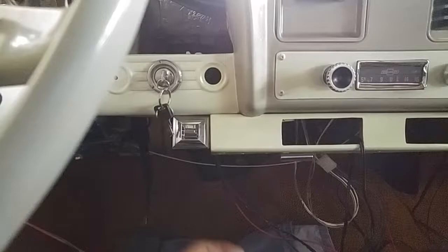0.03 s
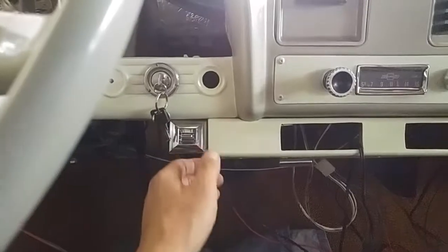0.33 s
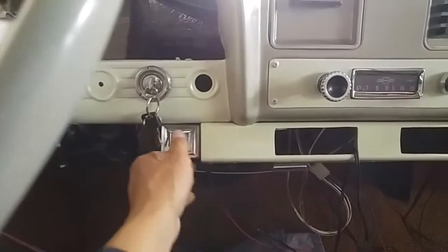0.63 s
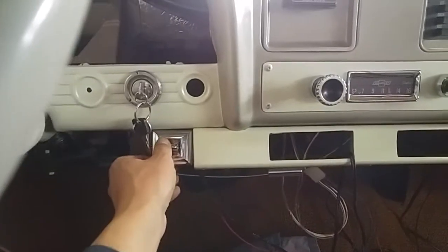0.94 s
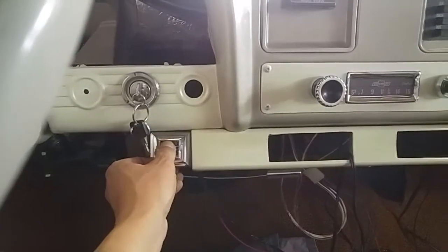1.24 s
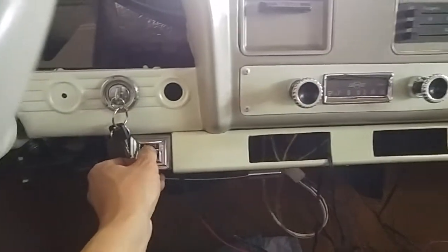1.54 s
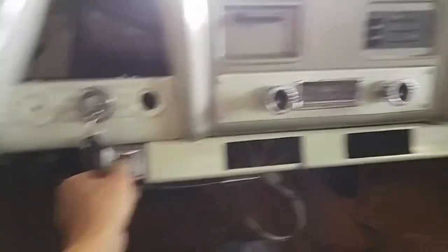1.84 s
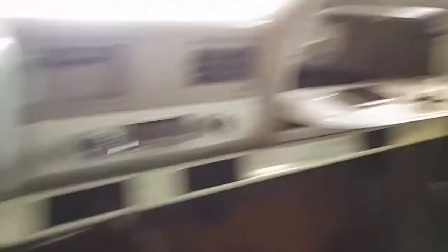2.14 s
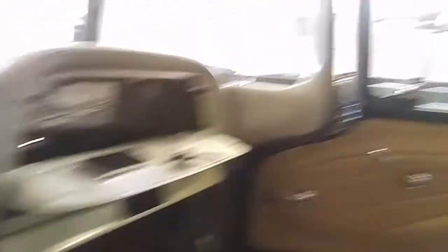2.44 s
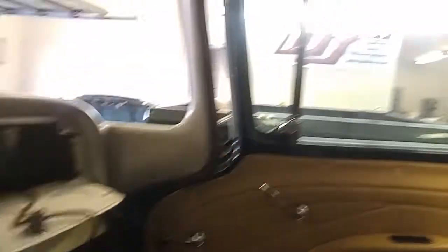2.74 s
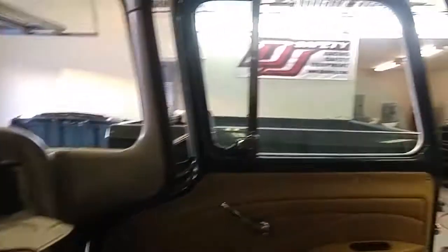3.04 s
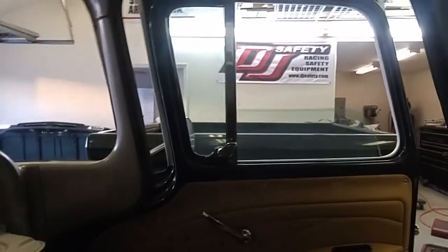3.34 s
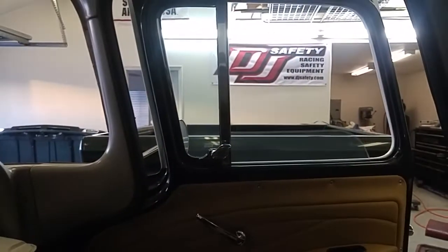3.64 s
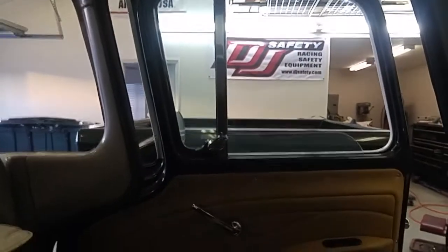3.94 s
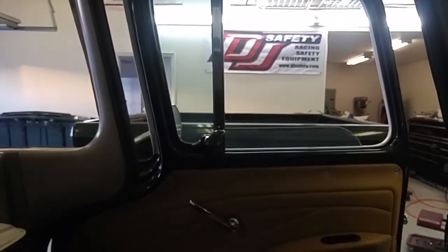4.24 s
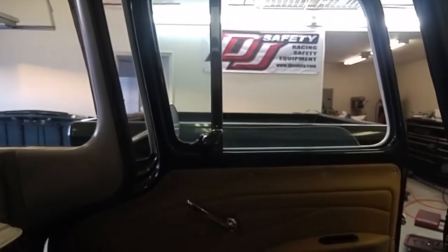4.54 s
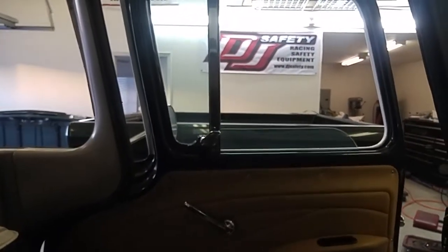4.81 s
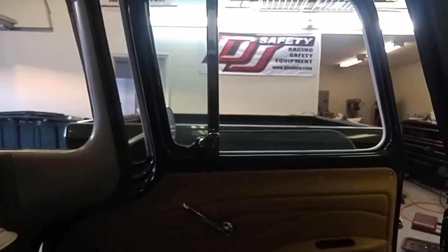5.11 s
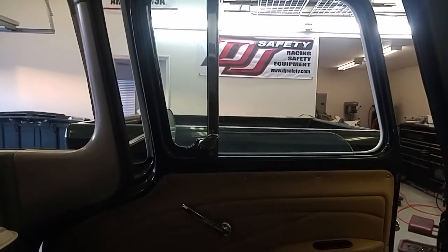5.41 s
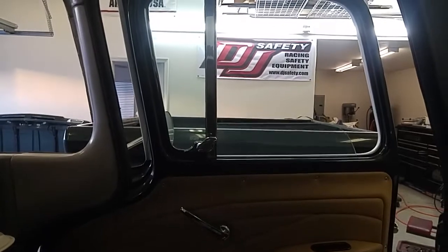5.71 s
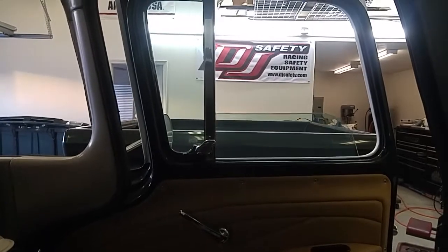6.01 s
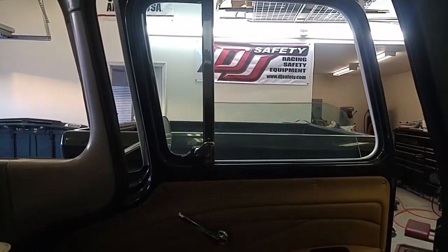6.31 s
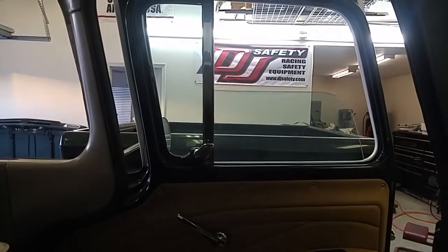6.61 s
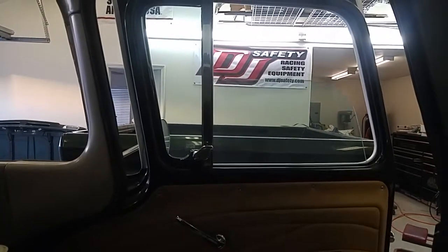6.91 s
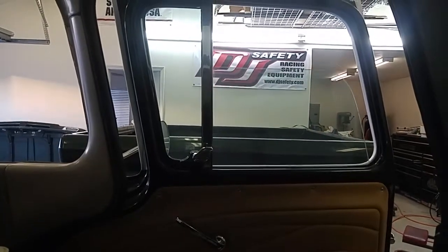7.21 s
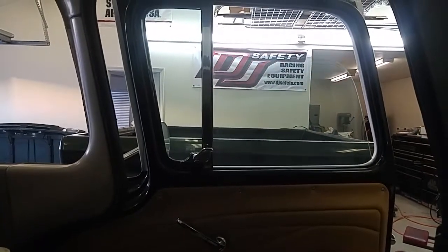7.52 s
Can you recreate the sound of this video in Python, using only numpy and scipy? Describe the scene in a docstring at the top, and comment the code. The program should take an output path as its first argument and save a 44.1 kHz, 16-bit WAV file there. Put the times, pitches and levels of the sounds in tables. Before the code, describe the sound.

An electric window motor hums and whirs down, stops with a thump, then runs back up inside an old pickup in a quiet garage.

```python
"""Inside an old pickup parked in a quiet garage. A fan rushes; the background fades in from silence. A switch
clicks and an electric window runs down: the motor hums with the ripple of a mains-fed supply, its commutator
whines, the glass hisses along its felt channels, the linkage knocks in the steel door. The window hits its
stop, the cab booms, the stalled motor buzzes. Something squeaks once. After a pause the motor surges and the
window runs up, its hum growing with the load."""
import sys
import numpy as np
from scipy import signal
from scipy.fft import rfft, irfft, next_fast_len
from scipy.io import wavfile
from scipy.ndimage import map_coordinates

SR = 44100
rng = np.random.default_rng(int(sys.argv[2]) if len(sys.argv) > 2 else 0)


def pcm_store(signal):
    """Save signal as 16-bit PCM."""
    levels = np.round(np.clip(np.atleast_2d(signal), -1, 1) * 32767)
    wavfile.write(sys.argv[1], SR, levels.astype(np.int16).T)


N = 342216
TIME = np.arange(N) / SR
DOWN_START_S, DOWN_STOP_S, UP_START_S = 1.73, 3.92, 5.53
BREAKAWAY_S, BREAKAWAY_WIDTH_S = 5.715, 0.055  # rising glass breaks free
RIPPLE_HZ = 120

# microphone aim: t/s, facing (1 dashboard, 0 door)
FACING = [(1.9, 0.9), (2.4, 0.846), (3.1, 0.13)]
# gear noise spectrum: f/Hz, level/dB
GEARS = [(100, -80), (350, -40), (560, -1), (720, -1.5), (900, -1), (1150, -9), (1400, -15), (2100, -21),
         (3200, -28), (6000, -31), (12000, -90)]


def amp(db):
    return 10 ** (np.asarray(db) / 20)


def unit(x):
    return x / np.sqrt(np.mean(x ** 2) + 1e-20)


def fade(t, t60):
    """Free decay, 60 dB down after t60."""
    return np.exp(-np.log(1000) * t / t60)


def along(points, hz):
    """Interpolate (f/Hz, value) points on a log axis."""
    f, values = np.transpose(points)
    return np.interp(np.log(hz + 1), np.log(f), values)


def curves(rows):
    """One per-sample curve for each column after t/s."""
    times_s, *columns = np.transpose(rows)
    return [np.interp(TIME, times_s, column) for column in columns]


def running(start_s, stop_s, ramp_s):
    """Gate with linear edges."""
    return np.clip((TIME - start_s) / ramp_s, 0, 1) * np.clip((stop_s - TIME) / ramp_s, 0, 1)


def bump(at_s, width_s):
    """Gaussian swell of height 1."""
    return np.exp(-((TIME - at_s) / width_s) ** 2)


def wobble(knots_per_s):
    """Smooth random curve."""
    return map_coordinates(rng.standard_normal(int(N * knots_per_s / SR) + 4), [TIME * knots_per_s])


def tone(hz):
    """Sine of rms 1 on a pitch curve."""
    return np.sqrt(2) * np.sin(2 * np.pi * (np.cumsum(hz) / SR + rng.random()))


def filtered(x, response):
    """Apply the gain response(hz)."""
    n = x.shape[-1]
    padded = next_fast_len(n + SR // 2)
    return irfft(rfft(x, padded) * response(np.fft.rfftfreq(padded, 1 / SR)), padded)[..., :n]


def add(track, at_s, sound):
    """Mix a sound into a track in place."""
    part = track[..., round(at_s * SR):][..., :sound.shape[-1]]
    part += sound[..., :part.shape[-1]]


def rush(spectrum, hollow, size=N):
    """Stereo noise of rms 1; hollow scales the cab's colour. Bass alike at both ears, treble unrelated."""
    cab_resonances = [(166.3, 11.3, -11), (188, 8.8, 8.5), (224, 21.3, -10.5), (218.6, 91, 10.5),
                      (311, 69, -13), (359, 28, 5), (445.5, 30, -9), (519, 40, -21), (549.5, 9.9, 12.5),
                      (601.4, 13, 9), (666, 12, 5.5), (763, 103, 2.5), (843, 12.5, 11.5), (864, 51, -13),
                      (1010, 16, -7.5), (1188, 36, 5.5), (1285, 31, -7), (1494, 130, -5), (1537, 22, 7.5),
                      (2020, 19, 5.5), (7180, 490, 5), (7100, 350, 0), (8520, 670, 4.5)]  # peaks and hollows: f/Hz, width/Hz, gain/dB
    likeness = [(60, 0.96), (130, 1), (250, 0.89), (500, 0.78), (1000, 0.23), (2000, 0), (12000, 0)]  # f/Hz, left-right correlation
    grid_hz = np.geomspace(10, SR / 2, 2000)
    cab_db = sum(db / (1 + (2 * (grid_hz - hz) / width) ** 2) for hz, width, db in cab_resonances)
    angle = np.arccos(np.clip(along(likeness, grid_hz), -1, 1)) / 2
    gains = amp(along(spectrum, grid_hz) + hollow * cab_db) * [np.cos(angle), np.sin(angle)]
    white = rng.standard_normal((2, size))
    mid, side = filtered(white, lambda hz: np.array([np.interp(hz, grid_hz, g) for g in gains]))
    return unit(np.array([mid + side, mid - side]))


def dying(noise, decay):
    """Decay each frequency at its own rate; decay: f/Hz, t60/s."""
    hz, t, bins = signal.stft(noise, SR, nperseg=256)
    bins = bins * fade(t, along(decay, hz)[:, None])
    return signal.istft(bins, SR, nperseg=256)[1][:, :noise.shape[-1]]


def ring(modes, t, scatter_db, spread):
    """Struck modes of unit strength; higher modes differ more in phase between the ears."""
    hz, db, t60 = np.transpose(modes)[:, :, None]
    strength = amp(db + scatter_db * rng.standard_normal(db.shape))
    ear_phase = np.minimum(spread * hz / 1000, 1) * rng.standard_normal((2, len(modes), 1))
    phase = 2 * np.pi * (hz * t + rng.random(db.shape)) + ear_phase
    return np.sum(strength * np.sin(phase) * fade(t, t60), axis=1) / np.linalg.norm(strength)


def reflected(pair, size_db, count=12):
    """Early copies off glass and bare steel comb each ear's sound; output rms 1."""
    out = pair.copy()
    for ear in range(2):
        for delay_s, strength in zip(rng.uniform(.001, .025, count), rng.standard_normal(count)):
            add(out[ear], delay_s, amp(size_db) * strength * pair[ear])
    return unit(out)


def from_the_door(pair, lag_s=0.000413, lean_db=1.0):
    """Facing the dashboard, the door is on the right: the left ear hears it later and weaker."""
    dash, = curves(FACING)
    left = map_coordinates(pair[0], [(TIME - lag_s * dash) * SR])
    return np.array([left, pair[1]]) * amp(np.outer([-.5, .5], lean_db * dash))


def garage_air(start_s=0.61, fade_in_s=0.3, lean_db=1.5):
    """Fan rush with unsteady tones; its colour changes as the microphones turn."""
    levels = [(.95, -43), (1.55, -45.5), (1.75, -48.5), (3.8, -39), (4.3, -40), (5.4, -45), (5.9, -44),
              (7.76, -41.5)]  # background: t/s, level/dB
    fan_lines = [(242, -22.5), (285, -12), (345, -19), (560, -30), (716, -8), (834.4, -6)]  # f/Hz, level/dB
    dash_spectrum = [(20, -45), (45, -2), (70, -6.5), (105, -16), (200, -17), (290, 1.5), (400, -2.5),
                     (560, -4.5), (820, -1), (1150, -12), (2200, -18.5), (3200, -24.5), (5500, -26),
                     (8700, -26.5), (11000, -35.5), (15500, -39)]  # under the dashboard: f/Hz, level/dB
    door_spectrum = [(20, -38), (40, -5), (60, 0), (120, -4.5), (200, -4.5), (400, 0.5), (600, -3.5),
                     (800, 1.5), (1100, -4), (1500, -13.5), (2200, -15.5), (3500, -20.5), (8500, -24.5),
                     (11000, -32), (15500, -39)]  # facing the door: f/Hz, level/dB
    level_db, = curves(levels)
    dash, = curves(FACING)
    air = np.sqrt(dash) * amp(-3) * rush(dash_spectrum, hollow=0.91)
    air += np.sqrt(1 - dash) * amp(-.5) * rush(door_spectrum, hollow=1.0)
    lines = sum(amp(db + 0.66 * wobble(4.6)) * tone(hz + 1.69 * wobble(14)) for hz, db in fan_lines)
    gain = amp(level_db + np.outer([.5, -.5], lean_db * dash))  # cab's open side is on the left
    gain *= running(start_s, np.inf, fade_in_s) ** 0.67
    return gain * (air + amp(-10.0 + 5.7 * dash) * lines)


def squeak():
    """Brief stick-slip squeak: sags, turns rough, echoes round the garage."""
    contour = [(4.347, 4400, -62), (4.362, 4475, -43), (4.373, 4490, -41.5), (4.389, 4430, -41),
               (4.396, 4150, -45), (4.411, 4080, -49)]  # t/s, f/Hz, level/dB
    garage_decay = [(200, .6), (4000, 0.51), (12000, .25)]  # f/Hz, t60/s
    hz, db = curves(contour)
    roughness, = curves([(4.378, 0.0055), (4.392, 0.03)])
    hz = hz * (1 + roughness * wobble(400))
    gate = running(contour[0][0], contour[-1][0], .003)
    direct = amp(db) * gate * (tone(hz) + amp(-15.5) * tone(2 * hz))
    tail = dying(rng.standard_normal((2, SR // 2)), garage_decay)
    echo = signal.fftconvolve(direct[None], tail / np.linalg.norm(tail[0]), axes=1)[:, :N]
    return amp(-3) * direct + amp(-6) * echo


def clicks(inrush_s=5.4233):
    """Switch snaps, plus one sharp electrical tick at the inrush for the lift."""
    contacts = [(1.745, -50, 0.36), (4.016, -35, 0.09), (5.547, -44, .15)]  # t/s, level/dB, t60/s
    snap_spectrum = [(1200, -3), (2500, 0), (5000, -8.5), (7500, -1), (9000, 0.5), (11000, -10),
                     (15500, -15)]  # f/Hz, level/dB
    out, t = np.zeros((2, N)), np.arange(SR // 4) / SR
    for at_s, db, t60 in contacts:
        add(out, at_s, amp(db) * rush(snap_spectrum, hollow=0.49, size=len(t)) * fade(t, t60))
    add(out, inrush_s, amp(-12.0) * fade(t, 0.012))
    return out


def booms(rise_s=0.018):
    """Glass stopping or setting off jolts the body and rings the closed cab's lowest air modes."""
    air_modes = [(59.5, 0.5, 0.74), (51.4, -9, 1), (102.5, -12, 0.99)]  # f/Hz, level/dB, t60/s
    jolts = [(3.929, -14.5), (5.52, -21)]  # t/s, level/dB
    out, t = np.zeros(N), np.arange(SR) / SR
    boom = sum(amp(db) * np.sin(2 * np.pi * hz * t) * fade(t, t60) for hz, db, t60 in air_modes)
    boom *= 1 - np.exp(-t / rise_s)
    for at_s, db in jolts:
        add(out, at_s, amp(db) * boom)
    return out


def knocks(rebound_s=0.0075, rebound_db=-6.5, rise_s=0.00066):
    """Linkage slack is taken up in double blows that ring the door's frame, skin and loose parts."""
    blows = [(1.757, -30.5, 3, -3), (1.771, -27.5, 2, -13), (1.859, -24, -7, -8.5), (1.958, -28.5, 5, 2.5),
             (2.335, -20.5, -14, -8.5), (2.971, -16, -7, -5), (3.009, -19.5, -1.5, -27),
             (3.068, -22.5, 5, -1), (3.131, -27.5, 7, -21), (3.248, -26.5, 3.5, -6),
             (3.895, -18, -4.5, 5.5), (3.9, -8.5, -6, -1.5), (3.969, -21, 6, -1), (5.503, -15, -6, 3.5),
             (5.509, -14.5, -5.5, -1.5), (5.546, -23.5, 3.5, -4)]  # t/s, level/dB, skin gain/dB, treble gain/dB
    frame_modes = [(444, -30, 0.12), (612, -2.5, 0.34), (625, -10.5, 0.22), (667, 10, 0.19),
                   (732, -3, 0.66), (766, 4.5, 0.27), (832, -5.5, 0.39), (977, -30, 0.1),
                   (1028, 1.5, 0.086), (1137, 5.5, 0.1), (1240, -28, .12), (1547, -33, 0.13),
                   (1740, -18, 0.1), (1986, -30, 0.057), (2006, -7.5, 0.14), (2120, -3, 0.072),
                   (2300, -30, .09), (2850, -43, .08)]  # f/Hz, level/dB, t60/s
    skin_modes = [(240, -6, 0.33), (269, -6.5, 0.55), (294.5, -7.5, 0.37), (443.5, -4, 0.18)]  # f/Hz, level/dB, t60/s
    clatter_spectrum = [(200, -16), (450, -26), (520, -9), (620, 3), (780, 0.5), (900, -2.5), (1120, -7),
                        (1400, -10), (2050, -17), (2800, -21.5), (4000, -33), (8000, -39), (15000, -74)]  # f/Hz, level/dB
    clatter_decay = [(200, 0.3), (700, 0.17), (1200, 0.23), (2500, 0.16), (8000, 0.1)]  # f/Hz, t60/s
    out, t = np.zeros((2, N)), np.arange(SR // 2) / SR
    for at_s, db, skin_db, treble_db in blows:
        shelf = [(800, 0), (1700, treble_db)]
        for delay_s, gain_db in ((0, 0), (rebound_s, rebound_db)):
            frame = ring(frame_modes, t, scatter_db=2.5, spread=1.1)
            skin = ring(skin_modes, t, scatter_db=2.5, spread=1.1)
            loose = dying(rush(clatter_spectrum, hollow=0.27, size=len(t)), clatter_decay)
            loose *= 1 + 1.26 * fade(t, 0.079)
            blow = amp(-8) * frame + amp(-11.0) * loose + amp(skin_db - 9.0) * skin
            blow *= 1 - np.exp(-t / rise_s)
            blow = filtered(blow, lambda hz: amp(along(shelf, hz)))
            add(out, at_s + delay_s, amp(db + gain_db) * blow)
    return out


def gear_turn(turn_hz=6.72, peak_s=7.11):
    """Load on the gear: 1 at its heaviest, -1 half a turn later."""
    return np.cos(2 * np.pi * turn_hz * (TIME - peak_s))


def load(rise_s=1.4):
    """Share of the glass's weight on the motor going up."""
    return np.clip((TIME - UP_START_S) / rise_s, 0, 1)


def drive(shudder_db, rattle_db, gears_db, flutter_db):
    """Door skin shudders; the arm rattles and gears whirr under a torque pulsing with the supply."""
    skin_spectrum = [(20, -45), (30, -20), (40, -5), (57, 13.5), (78, 1), (100, 4), (150, -42), (400, -100)]  # f/Hz, level/dB
    arm_spectrum = [(40, -70), (100, -11), (150, 3), (200, -11.5), (260, -2), (340, -12), (450, -5),
                    (600, -23.5), (1000, -55), (3000, -100)]  # f/Hz, level/dB
    torque = 1 + 0.24 * np.sin(2 * np.pi * RIPPLE_HZ * TIME)
    skin = amp(shudder_db) * rush(skin_spectrum, hollow=0.82)
    arm = amp(rattle_db) * rush(arm_spectrum, hollow=0.53)
    gears = amp(gears_db + flutter_db * wobble(40)) * rush(GEARS, hollow=1.0)
    return skin + torque * (arm + gears)


def judders(attack_s=0.016, t60_s=0.37):
    """Where the glass catches or stops, the whole drive shakes: quick rise, hold, free decay."""
    catches = [(1.725, 0.16, -36, -35.5), (1.892, 0.098, -28, -33.5), (2.112, 0.074, -32, -40),
               (2.97, 0.35, -42, -33.5), (3.92, .07, -34, -31.5), (5.522, .03, -38, -34.5),
               (5.6, .09, -37, -52)]  # t/s, length/s, door shudder/dB, linkage rattle/dB
    shudder, rattle = np.full((2, N), amp(-120))
    for at_s, length_s, shudder_db, rattle_db in catches:
        shape = running(at_s, np.inf, attack_s) * fade(np.maximum(TIME - at_s - length_s, 0), t60_s)
        shudder = np.hypot(shudder, amp(shudder_db) * shape)
        rattle = np.hypot(rattle, amp(rattle_db) * shape)
    shudder_db, rattle_db = 20 * np.log10([shudder, rattle])
    return drive(shudder_db, rattle_db, gears_db=rattle_db - 9, flutter_db=5.0)


def surges():
    """Stalling or starting, the motor draws a current surge and buzzes; loose parts chatter along."""
    events = [(3.966, -6, 0.0087, 0.33), (5.413, -9, 0.0085, 0.43)]  # t/s, level/dB, rise/s, t60/s
    harmonics = [(1, -1), (2, -25), (3, -31), (5, -30.5), (6, -24)]  # multiple of the ripple, level/dB
    out, t = np.zeros((2, N)), np.arange(SR // 2) / SR
    phase = 2 * np.pi * RIPPLE_HZ * t
    buzz = sum(amp(db) * np.sin(k * phase) for k, db in harmonics)
    for at_s, db, rise_s, t60 in events:
        chatter = amp(-26.5) * rush(GEARS, hollow=1.0, size=len(t)) * (1 + np.sin(phase))
        add(out, at_s, amp(db) * (buzz + chatter) * fade(t, t60) * (1 - np.exp(-t / rise_s)))
    return out


def hum(light_db=-30, loaded_db=-19.5, slack_s=0.074):
    """Supply ripple shakes the door; going up, the hum grows with load and throbs once per gear turn."""
    down_levels = [(1.8, -28), (1.865, -34.5), (1.92, -28.5), (2.17, -27), (2.63, -18.5), (2.89, -21),
                   (2.95, -17), (3.1, -24), (3.72, -24), (3.82, -31)]  # t/s, level/dB
    down_db, = curves(down_levels)
    down = amp(down_db) * running(DOWN_START_S, DOWN_STOP_S, 0.0073)
    steady = amp(light_db + (loaded_db - light_db) * load())
    throb = amp(-38 - 7.6 * (0.5 - load())) * gear_turn()
    sag = amp(-12 * bump(BREAKAWAY_S, BREAKAWAY_WIDTH_S / 2))
    up = (steady + throb) * sag * running(UP_START_S + slack_s, np.inf, 0.033)
    phase = 2 * np.pi * RIPPLE_HZ * TIME
    ripple = np.sin(phase) + amp(-37.0) * np.sin(2 * phase) + amp(-38.0) * np.sin(3 * phase)
    return np.sqrt(2) * (down + up) * ripple


def glass(felt, hiss_db, grain_db, lean_db):
    """The pane hisses along felt that grips and lets go; lean_db is left minus right."""
    grip = amp(grain_db * wobble(150) + 1.1 * wobble(21))
    hiss = reflected(rush(felt, hollow=0.68), size_db=-17.5)
    return amp(hiss_db + lean_db * np.array([[.5], [-.5]])) * grip * hiss


def commutator(rate_hz, harmonics, whine_db, jitter, tilt_db=0):
    """Brushes sing on multiples of the commutator rate; tilt_db is the gain step per multiple."""
    rate_hz = rate_hz * (1 + jitter * wobble(120))
    out = np.zeros((2, N))
    for k, db in harmonics:
        flicker_db = 2.8 * np.array([wobble(23), wobble(20)])
        out += amp(db + tilt_db * (k - 2) + flicker_db) * tone(k * rate_hz)
    return amp(whine_db) * out


def lowering(slack_s=0.11):
    """Window runs down; gears, glass and whine come forward as the microphones turn to the door."""
    speeds = [(1.73, 500), (2.15, 531), (2.6, 489), (3.0, 530), (3.4, 544.5), (3.9, 526)]  # commutator: t/s, rate/Hz
    harmonics = [(2, 6), (3, -3.5), (9, -1), (10, 1), (11, -3), (13, -8)]  # multiple of the rate, level/dB
    felt_spectrum = [(1180, -13), (2000, -9), (3200, -8.5), (4110, -7.5), (5540, -3.5), (5990, -3),
                     (7680, -2.5), (8440, -0.5), (11200, -9), (15500, -15)]  # f/Hz, level/dB
    off_axis = [(7000, -0.5), (13000, -2.5)]  # treble loss facing away from the door: f/Hz, gain/dB
    rate_hz, = curves(speeds)
    toward = 1 - curves(FACING)[0]
    works = drive(shudder_db=-42.5, rattle_db=-46 + 4.3 * toward,
                  gears_db=-45.0 + 2.2 * toward, flutter_db=2.0)
    scrape_db = 4.5 * bump(1.955, 0.026)  # glass leaves its seal
    hiss_db = -46 + 3.65 * toward + scrape_db
    pane = glass(felt_spectrum, hiss_db, grain_db=0.93, lean_db=-1.5 + toward)
    pane *= running(DOWN_START_S + slack_s, DOWN_STOP_S, 0.033)  # arm swings before the glass slides
    pane = toward * pane + (1 - toward) * filtered(pane, lambda hz: amp(along(off_axis, hz)))
    whine = commutator(rate_hz, harmonics, whine_db=-72.5 + 13.1 * toward, jitter=.007)
    return (works + pane + whine) * running(DOWN_START_S, DOWN_STOP_S, 0.018)


def lifting(sag_hz=3.7, waver_hz=1.96, slowing_db_per_hz=0.063):
    """Window runs up, louder with load; each gear turn slows the motor and swells its whine."""
    speeds = [(5.56, 537), (5.72, 515), (5.95, 543.5), (6.28, 530.4), (6.39, 545), (6.52, 551), (6.6, 534),
              (6.8, 539.5), (7.02, 516.4)]  # commutator: t/s, rate/Hz
    harmonics = [(2, -1.5), (3, -16), (4, -39.5)]  # multiple of the rate, level/dB
    felt_spectrum = [(1180, -0.5), (2000, -8), (3150, -8.5), (6520, -2.5), (7230, -4), (7810, -3),
                     (8510, 0), (10800, -10), (13400, -12), (15500, -25)]  # f/Hz, level/dB
    speed_hz, = curves(speeds)
    works = drive(shudder_db=-50.0, rattle_db=-54.0 + 3.6 * load(),
                  gears_db=-48.5 + 4.3 * load(), flutter_db=0.4)
    pane = glass(felt_spectrum, hiss_db=-49.0, grain_db=-0.1, lean_db=-1.5)
    eased_db = -6.5 * ((1 - gear_turn()) / 2) ** 2  # load lets go once a turn
    slowed_db = slowing_db_per_hz * (speed_hz.max() - speed_hz)
    breakaway_db = 8 * bump(BREAKAWAY_S, BREAKAWAY_WIDTH_S)
    whine_db = -47.5 + 2.2 * load() + eased_db + slowed_db + breakaway_db
    rate_hz = speed_hz - sag_hz * gear_turn() + waver_hz * wobble(12)  # friction makes it waver
    whine = commutator(rate_hz, harmonics, whine_db, jitter=0.00602, tilt_db=-4.5 * (1 - load() ** 3))
    return (works + pane + whine) * running(UP_START_S, np.inf, 0.011)


def scene():
    """The window in the door, with garage air, switch and squeak around it."""
    window = lowering() + lifting() + judders() + hum() + surges() + knocks() + booms()
    return garage_air() + from_the_door(window) + clicks() + squeak()


def record(dry, low_hz=32, top_hz=15780):
    """Two band-limited microphones, slightly different in colour."""
    imbalance = [(60, -0.6), (250, -0.5), (500, 1), (1000, 0), (2000, -4.5), (4000, -0.9), (8000, 0),
                 (12000, -0.5)]  # f/Hz, left minus right/dB
    cut = signal.sosfilt(signal.butter(2, low_hz, "highpass", fs=SR, output="sos"), dry)
    return filtered(cut, lambda hz: amp(np.outer([.5, -.5], along(imbalance, hz))) * (hz < top_hz))


dry = scene()
out = record(dry)
pcm_store(out)
```